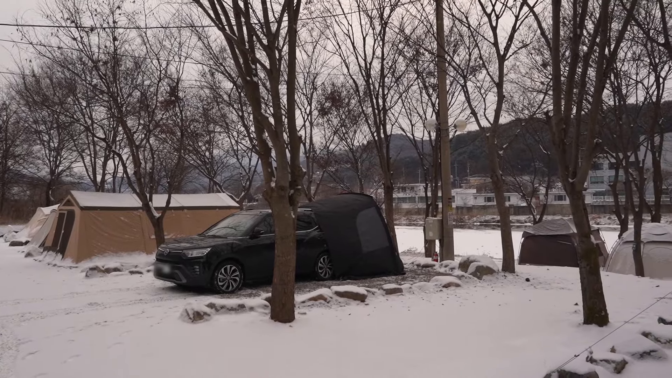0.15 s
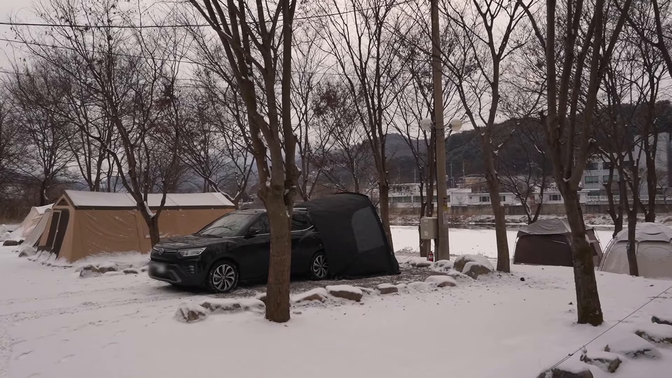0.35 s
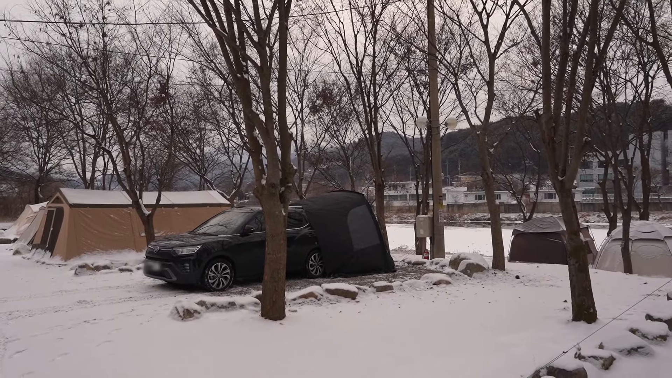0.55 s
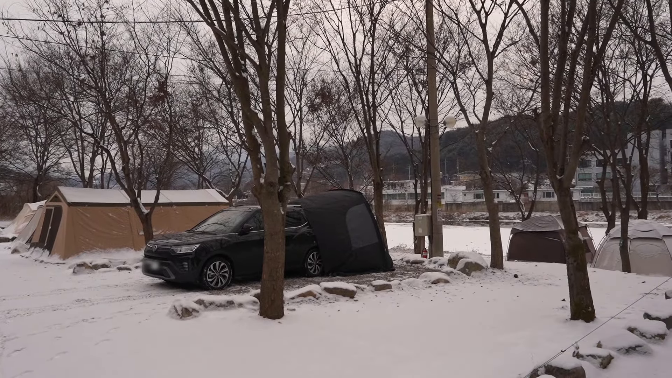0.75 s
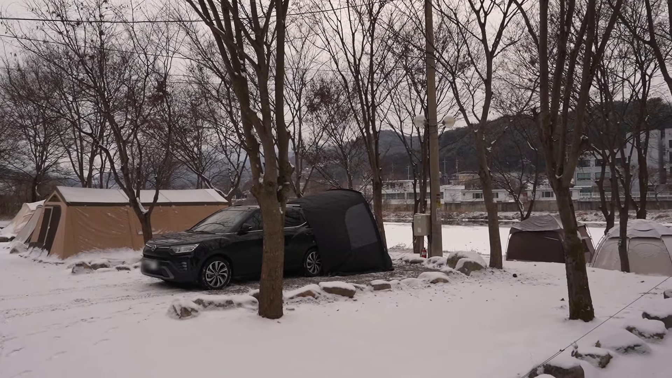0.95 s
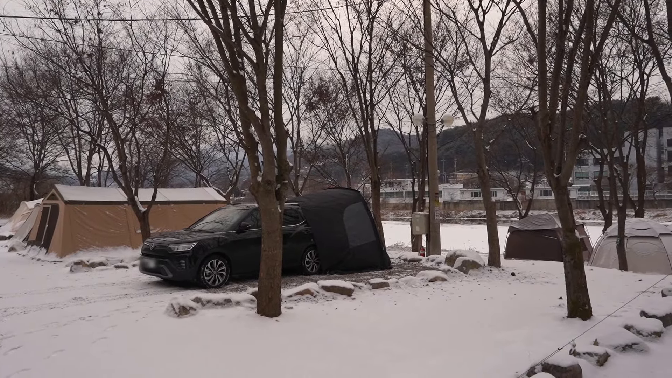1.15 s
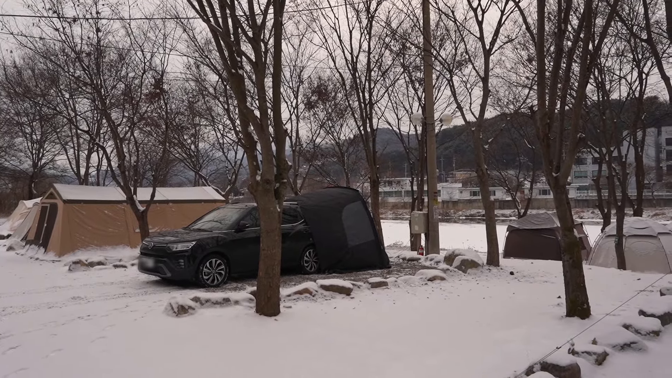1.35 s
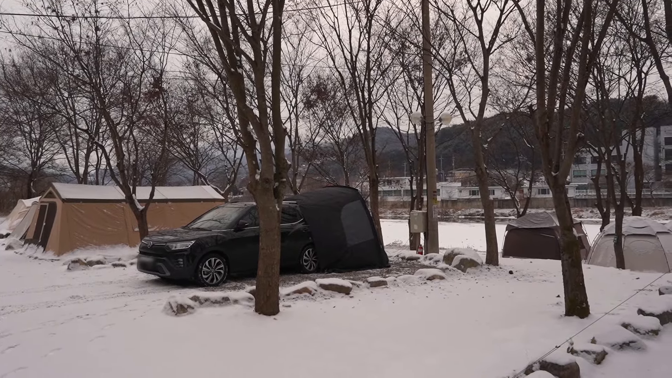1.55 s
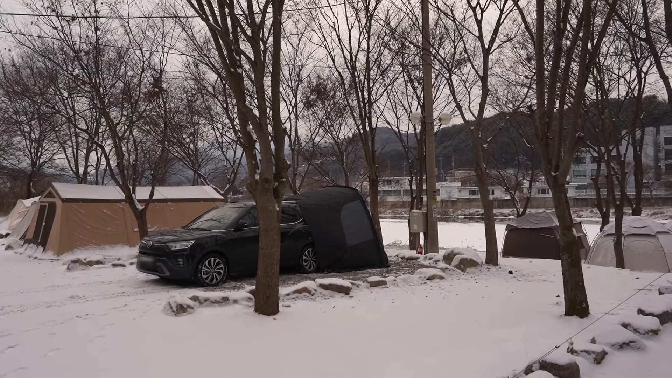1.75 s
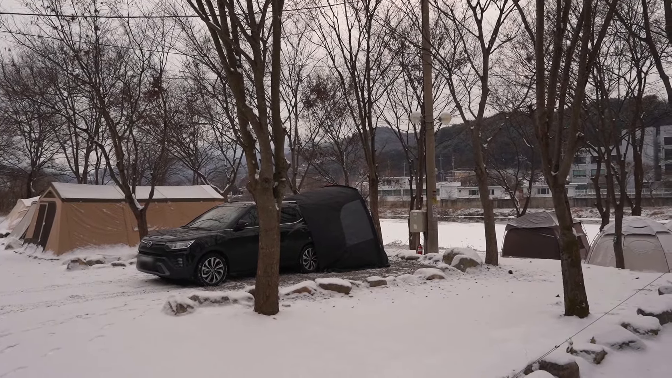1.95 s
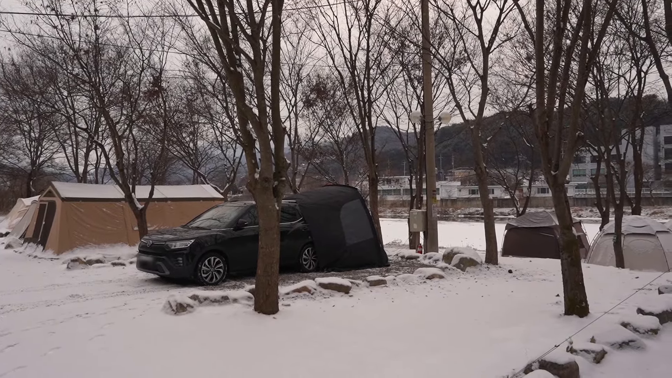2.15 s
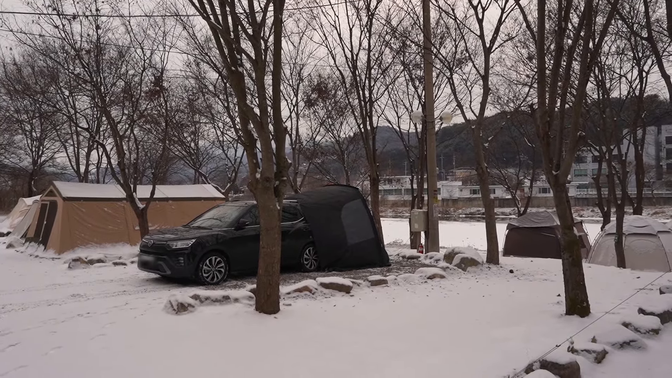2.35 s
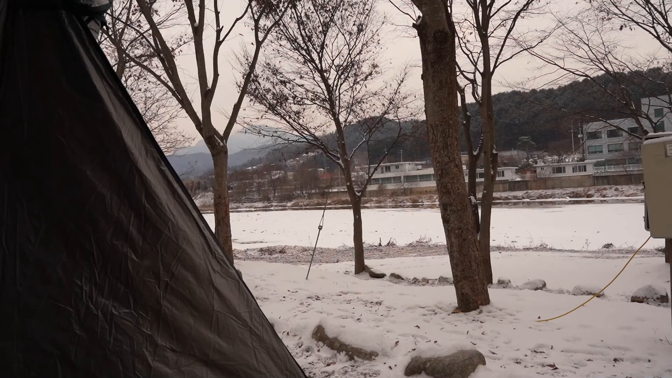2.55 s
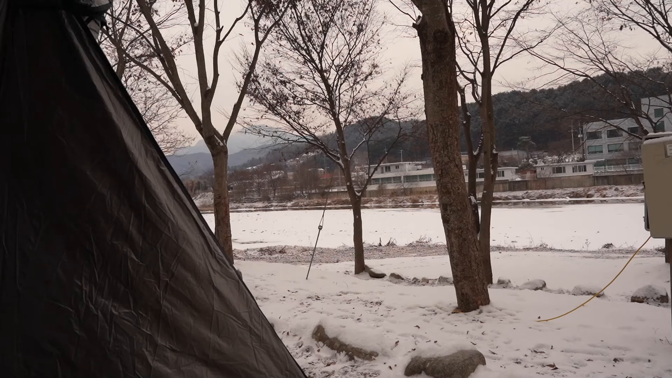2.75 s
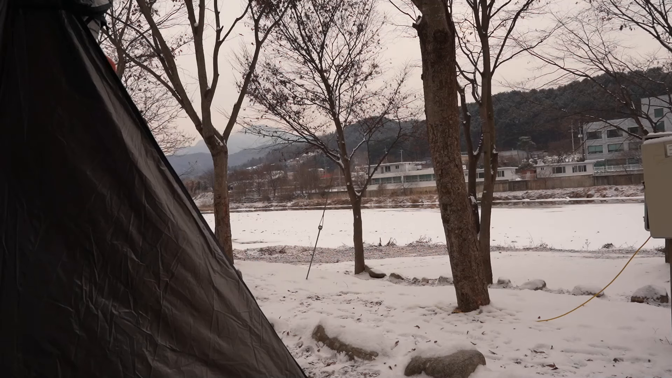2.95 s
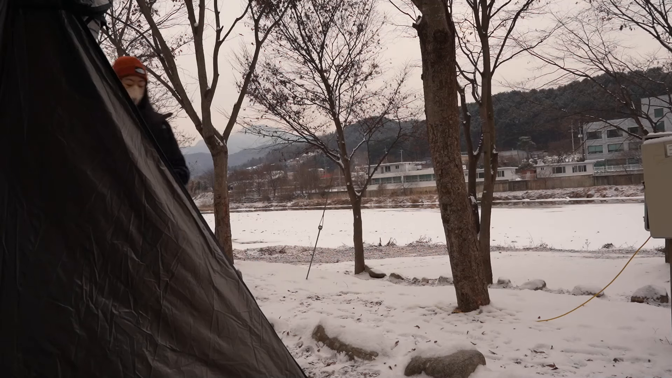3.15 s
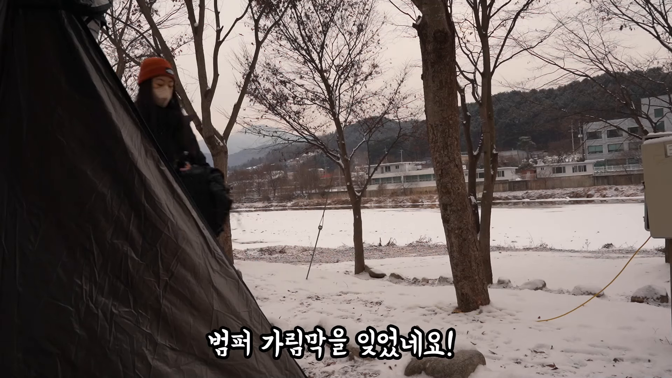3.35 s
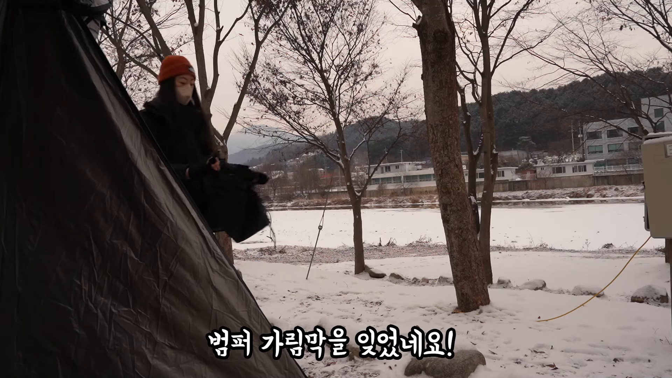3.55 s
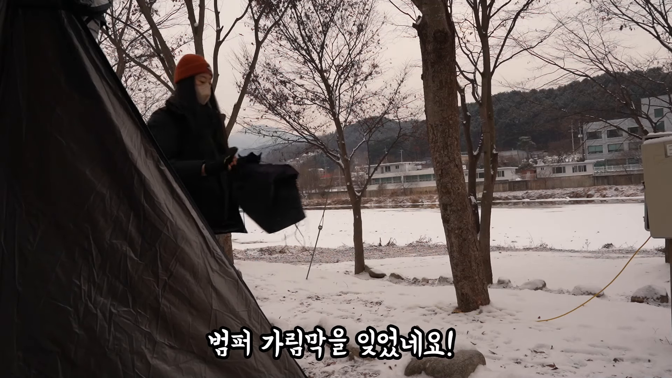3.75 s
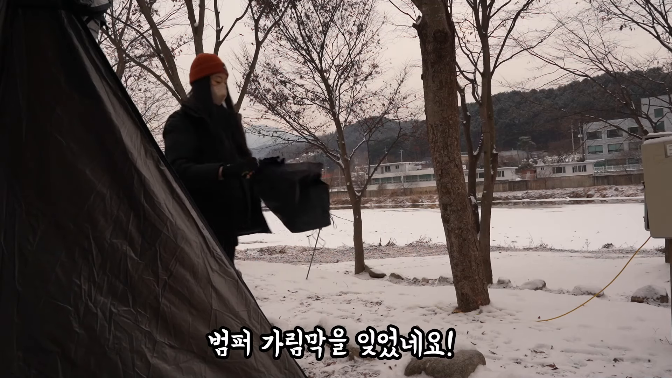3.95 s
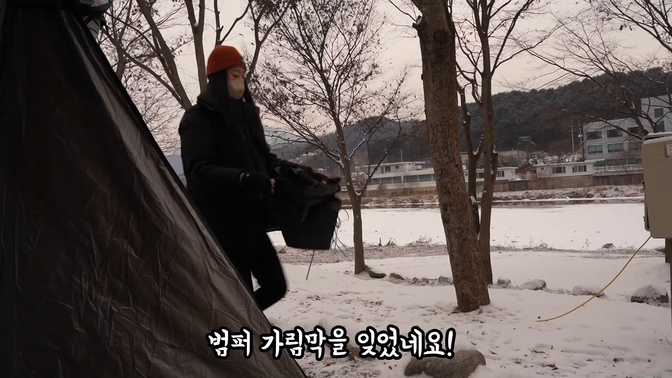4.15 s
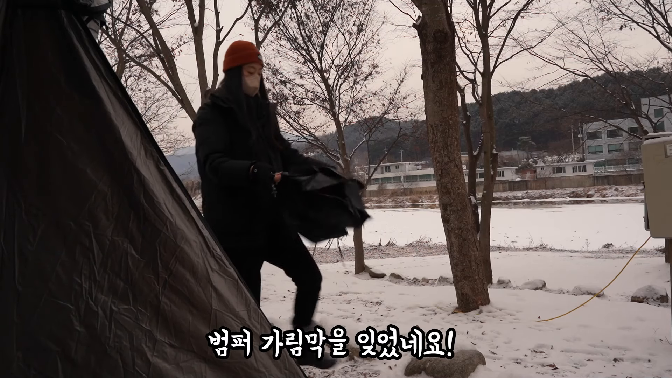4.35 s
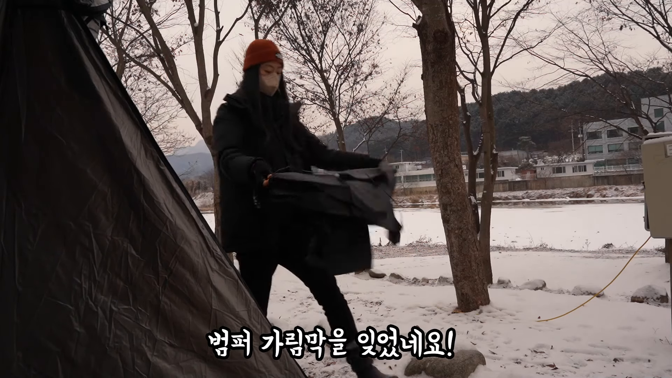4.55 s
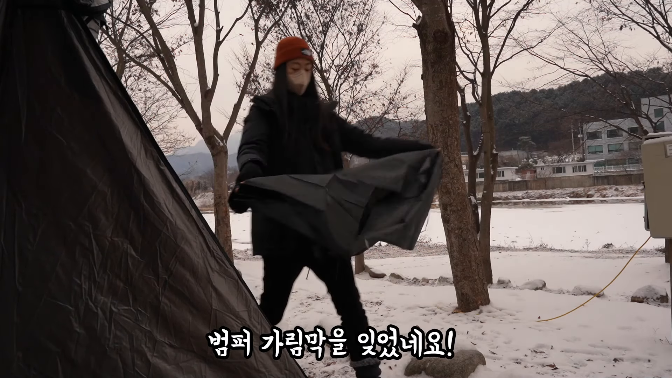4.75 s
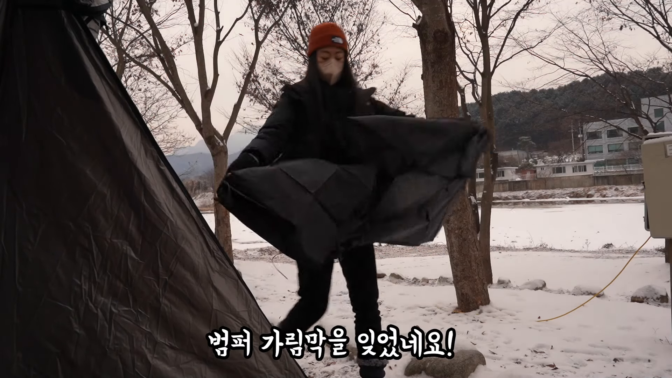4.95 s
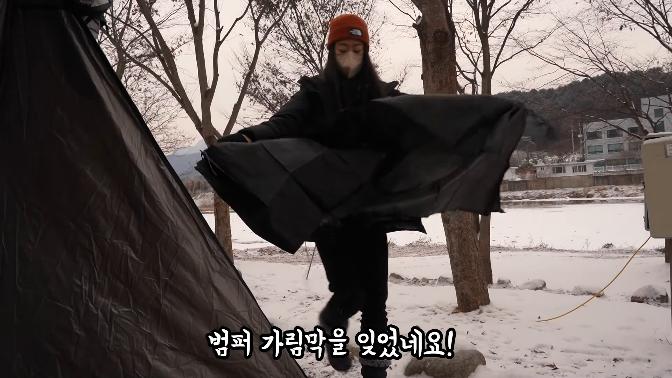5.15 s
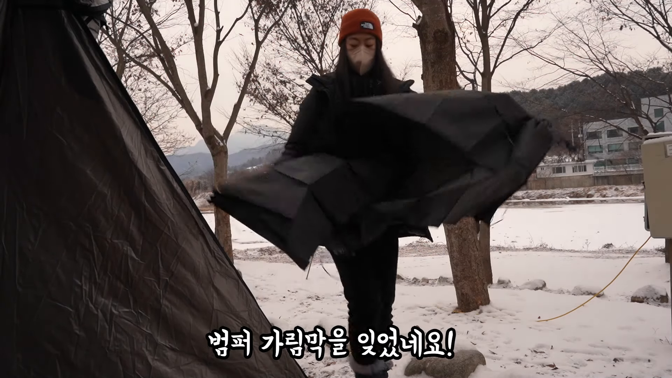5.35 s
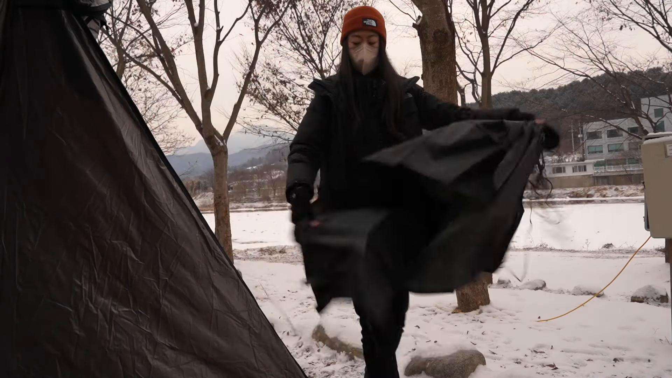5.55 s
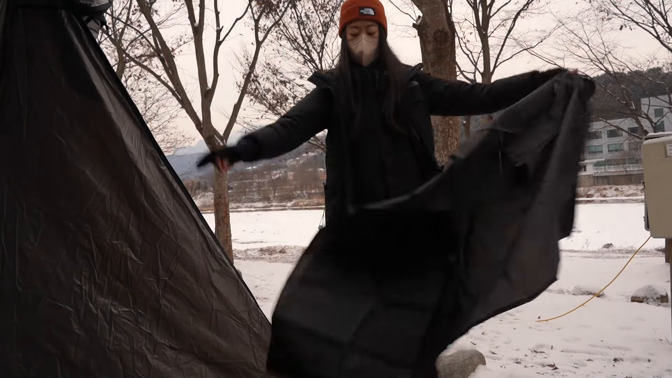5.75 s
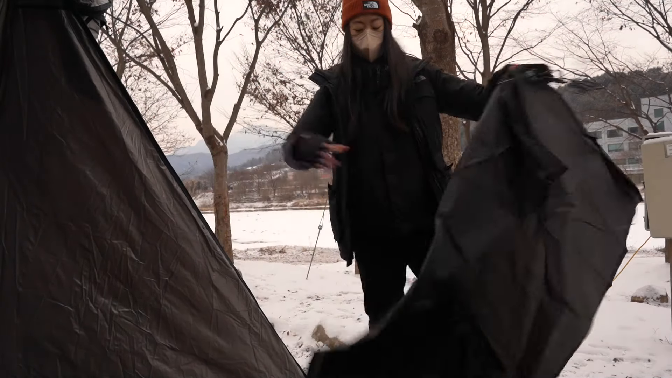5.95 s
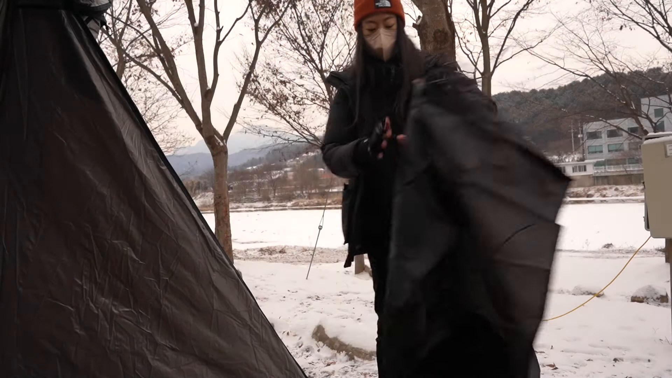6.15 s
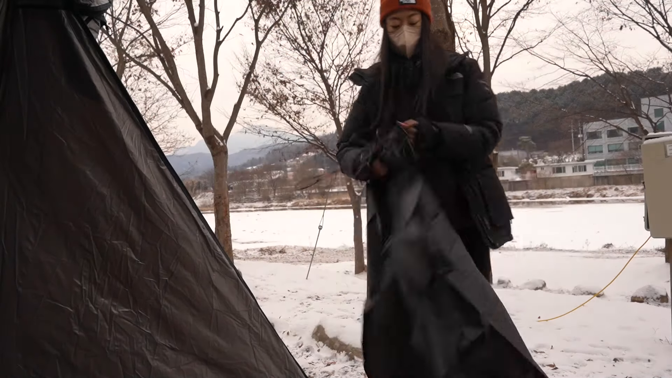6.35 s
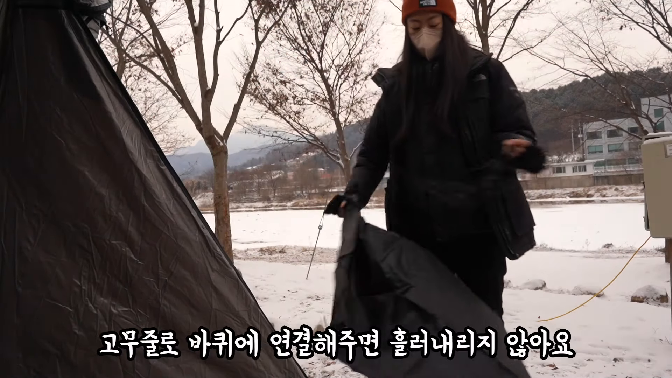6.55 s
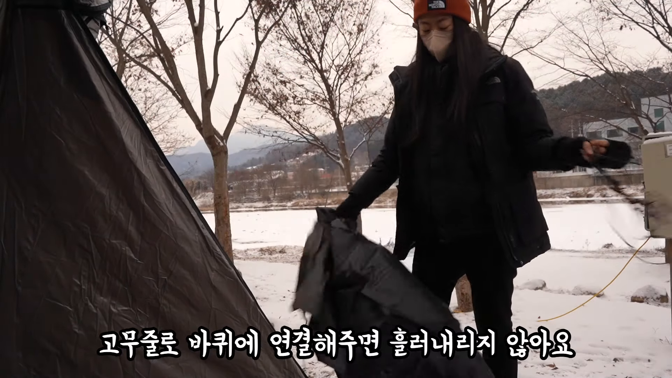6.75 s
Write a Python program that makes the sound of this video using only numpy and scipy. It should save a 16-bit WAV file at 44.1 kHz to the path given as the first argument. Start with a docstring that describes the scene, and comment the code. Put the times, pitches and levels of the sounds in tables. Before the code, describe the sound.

A quiet open-air hum with faint distant barks and bird chirps cuts abruptly to a stiff synthetic sheet rustling, crackling and snapping ever louder up close.

```python
"""A stiff synthetic curtain is carried closer, unfolded and shaken out: bursts of filtered noise and
plucked resonators for its creases, a smooth swish, louder single snaps, a low noise rumble.
Before it, joined by a cut: a quiet snowy camp ground with far traffic hum (banded noise), distant
barks (hoarse partials), a small bird (swept near sines) and a few nearby ticks (noise puffs)."""
import sys
import numpy as np
from scipy import signal
from scipy.io import wavfile
from scipy.ndimage import uniform_filter1d

SR = 44100
rng = np.random.default_rng(int(sys.argv[2]) if len(sys.argv) > 2 else 0)


def persist_wave(psi):
    """Save psi, clipped to +-1, as 16-bit WAV."""
    counts = np.round(np.clip(psi, -1, 1) * 32767).astype(np.int16)
    wavfile.write(sys.argv[1], SR, np.atleast_2d(counts).T)


N = 304290

# Far hum and hiss: spectrum (frequency [Hz], relative density [dB])
AIR_COLOUR = [(24, -65), (40, -39), (199, -23), (363, -20), (422, -12.5), (570, -4), (896, 1), (1120, -3),
              (1210, -8), (1300, -2), (1550, -8), (1900, -8.5), (2700, -19.5), (4800, -26.5), (14800, -29),
              (16000, -27)]
# Left-right correlation of the air (frequency [Hz], likeness [-1 to 1])
AIR_LIKENESS = [(60, 0.78), (130, 1), (290, 0.62), (640, 0.79), (1410, 0.18), (3100, -0.7), (6820, 1),
                (15000, 0.98)]
# Stereo balance of the air (frequency [Hz], left minus right [dB])
AIR_BALANCE = [(60, -4), (130, 2), (290, -3), (640, 1.5), (1410, -1), (3100, -5), (6820, 1.5), (15000, -1)]
# Far barks (time [s], length [s], start pitch [Hz], middle pitch [Hz], end pitch [Hz],
# second partial level [dB], fundamental re second partial [dB], throat re second partial [dB])
BARKS = [(0.052, 0.15, 567, 578, 540, -43.5, -11, -5), (0.309, 0.18, 518, 554, 519, -44.5, -14, -3.5),
         (0.583, 0.1, 516, 544, 530, -47.5, -29, -15), (0.902, 0.18, 577, 599, 612, -42, -16, -11),
         (1.132, 0.093, 559, 589, 590, -47.5, -7, -13), (1.971, 0.2, 462, 537, 452, -53, 13, -12),
         (2.328, 0.17, 630, 610, 597, -44.5, -13, -4.5)]
# Bird whistles (time [s], length [s], start [Hz], middle [Hz], end [Hz], level before flutter [dB])
CHIRPS = [(0.429, 0.11, 2930, 5020, 6200, -54.5), (0.519, 0.068, 3300, 4400, 5500, -60),
          (0.635, 0.069, 2550, 3850, 5270, -60), (1.39, 0.1, 2300, 4750, 6550, -50.5),
          (1.5, .055, 3720, 4580, 5500, -62), (1.67, 0.064, 2820, 4070, 5500, -61),
          (1.865, 0.013, 7600, 6660, 6400, -47), (2.38, .01, 7000, 6700, 6600, -60),
          (2.504, 0.067, 2850, 4070, 5140, -47.5)]
# Nearby ticks (time [s], peak before pan [dB], ring [Hz], left minus right [dB])
TICKS = [(1.756, -37.5, 4770, -4), (1.7964, -45, 6470, 2), (1.8145, -31.5, 1600, -1),
         (1.998, -35.5, 3800, -14), (2.2445, -34, 980, -5), (2.2767, -48, 3560, 22),
         (2.2939, -16.5, 3300, -11.5)]
# Low rumble under the cloth, uneven in level (time [s], level [dB])
RUMBLE_LEVEL = [(2.56, -74), (2.68, -65), (2.85, -57), (2.91, -67), (3.1, -64), (3.13, -59), (3.38, -76),
                (3.43, -67), (3.71, -80), (4.03, -63), (4.08, -93), (4.13, -57), (4.18, -77), (4.23, -58),
                (4.29, -93), (4.44, -67), (4.49, -100), (4.66, -62), (4.9, -85), (4.94, -60), (5.25, -95),
                (5.29, -65), (6.08, -58.5), (6.13, -62), (6.23, -56), (6.27, -71), (6.73, -61.5),
                (6.79, -55), (6.81, -66), (6.9, -60)]
# Spectrum of that rumble (frequency [Hz], relative density [dB])
RUMBLE_COLOUR = [(18, -60), (30, -39), (113, -21), (147, -13.5), (183, -13), (260, -6), (340, -29),
                 (570, -120)]
# Creases that snap, folds that flap open
# (time [s], peak before pan [dB], ring [Hz], left minus right [dB], t60 of a 3 kHz ring [s])
SNAPS = [(2.5611, -33, 864, -1, 0.04), (2.575, -27, 853, 2, 0.036), (2.7017, -27, 1120, 1, 0.044),
         (2.7152, -21, 1210, -4, 0.04), (2.746, -25, 1950, 4, 0.04), (2.7754, -22, 883, -1, 0.04),
         (2.8604, -29, 1260, -1.5, 0.04), (2.863, -21.5, 1620, 8, 0.051), (2.872, -29, 1250, -7, 0.046),
         (2.955, -28, 2590, 22, 0.046), (3.041, -29, 1130, 1, 0.061), (3.073, -20, 2900, -9, 0.04),
         (3.0886, -20, 1440, 1.0, 0.05), (3.1322, -20, 1110, 8, 0.028), (3.1355, -16, 2240, -11, 0.03),
         (3.2859, -20, 1290, -7, 0.05), (3.2948, -18, 3060, -2, 0.046), (3.3189, -16, 1250, 5, 0.048),
         (3.3328, -15.5, 2720, -5, 0.087), (3.4797, -19, 1280, 3, 0.04), (3.5065, -22, 1220, -4, 0.025),
         (3.5363, -12.5, 9800, 3, 0.036), (3.5454, -14, 1600, -2, 0.037), (3.5553, -13.5, 3770, -1, 0.04),
         (3.5614, -13, 3270, -11, 0.035), (3.6883, -14, 3290, -9, 0.033), (3.7295, -19, 3500, -16, 0.04),
         (3.8023, -13, 3280, -2, 0.037), (3.8275, -9, 8100, -1, 0.044), (3.86, -14, 2990, 0.5, 0.036),
         (3.878, -15, 3880, 1.0, 0.04), (3.892, -21, 3600, -1, 0.04), (3.925, -13.5, 3480, -4, 0.047),
         (4.008, -25, 3130, -8, 0.04), (4.0493, -19.5, 930, 0.5, 0.066), (4.1024, -31, 2990, 1, 0.044),
         (4.154, -21, 1010, 5, 0.045), (4.183, -14.5, 930, -4, 0.046), (4.218, -24, 4510, -7, 0.04),
         (4.2374, -26, 840, 5, 0.058), (4.2986, -17, 3420, 4, 0.04), (4.4097, -16, 8320, -2, 0.043),
         (4.5946, -8, 1530, 1, 0.049), (4.6714, -20, 3700, -2, 0.035), (4.8252, -7, 910, 2, 0.094),
         (4.8886, -7.5, 3600, 0.0, 0.04), (4.9545, -14, 10000, -3, 0.015), (5.0204, -19, 961, 0, 0.04),
         (5.06, -17, 9000, -2, 0.012), (5.094, -10.5, 2100, -10, 0.04), (5.11, -19, 1580, 2, 0.04),
         (5.1595, -11, 1250, 1, 0.032), (5.2026, -12, 5040, -3, 0.032), (5.2207, -22, 1580, -0.5, 0.049),
         (5.2575, -13, 9000, -1.5, 0.01), (5.31, -19, 1320, -7, 0.047), (5.3775, -7, 7100, -1.0, 0.01),
         (5.4963, -10, 9400, 6, 0.006), (5.5456, -6, 3640, -3, 0.03), (5.724, -10.5, 1840, -9, 0.1),
         (5.9728, -17, 1160, -12, 0.055), (5.9834, -14, 1260, -7, 0.064), (6.2233, -26, 1250, 3, 0.04),
         (6.2344, -8.5, 1870, -8, 0.069), (6.27, -12, 7000, 3, 0.04), (6.3485, -10.5, 1580, -6, 0.053),
         (6.379, -12, 1500, -9, 0.034), (6.4313, -5, 7600, -1, 0.064), (6.4452, -8, 3800, -3, 0.069),
         (6.4895, -8.5, 4540, -2, 0.03), (6.5212, -7.5, 9500, -1, 0.087), (6.564, -9, 9450, 2, 0.044),
         (6.6888, -10.5, 3660, 0, 0.04), (6.7398, -10, 1600, -3, 0.056), (6.795, -21, 4600, -9, 0.04),
         (6.8377, -13, 1290, -1, 0.04)]
# Handling of the cloth
# (time [s], crackle level [dB], low folds re crackle [dB], sheen re crackle [dB])
CLOTH_HANDLING = [(2.56, -43, 6, -5), (2.58, -36.5, -2.5, -12), (2.6, -42.5, 6.5, -2), (2.69, -43, 8.5, -2),
                  (2.72, -35, -1, -7), (2.79, -35.5, 2.5, -2.5), (2.85, -44.5, 8, 2),
                  (2.86, -31, -0.5, -16), (2.92, -40.5, 7.5, -5), (2.96, -33.5, 1.5, -13),
                  (3.01, -42.5, 9, 1), (3.04, -34.5, 3.5, -7), (3.08, -33, 1.5, -2),
                  (3.19, -40.5, 9.5, -1.5), (3.27, -36.5, 4.5, 0.5), (3.3, -34.5, 3, -4),
                  (3.42, -38.5, 4.5, 0), (3.53, -34.5, -1, 2.5), (3.56, -25, -7.5, -3), (3.59, -35.5, 0, 4),
                  (3.61, -31, 0, 1.5), (3.77, -30.5, -4.5, -1), (3.86, -25, -5.5, 0.5), (3.94, -27, -1, -1),
                  (4.0, -38, 2.5, 2), (4.01, -29, -7, -9), (4.02, -36, 2.5, -6), (4.25, -30.5, -3, -0.5),
                  (4.31, -20.5, -3.5, 0), (4.32, -28.5, -1.5, 1), (4.4, -23, -8, 3.5), (4.44, -25, -9, 2),
                  (4.72, -21, -8, -3), (4.99, -30, -7, -1), (5.05, -28.5, -4.5, 0.5), (5.1, -24, -9, -5),
                  (5.18, -28.5, -6.5, -1), (5.21, -22.5, -10.5, -2.5), (5.24, -29, -8, 0.5),
                  (5.3, -26.5, -4.5, 0), (5.48, -21, -6.5, -2), (5.51, -29, -7.5, 3), (5.55, -22, -7, 0),
                  (5.81, -26.5, -3.5, -2.5), (5.85, -21, -7.5, -3), (5.96, -30, -2.5, -4),
                  (6.02, -21.5, -6, -1), (6.04, -26, -7.5, -3.5), (6.16, -32.5, -4, 0.5),
                  (6.27, -24.5, -9, -4), (6.32, -29.5, -10.5, 1), (6.37, -24.5, -5, -1),
                  (6.54, -28, -11.5, 0.5), (6.62, -31.5, -3.5, 0), (6.75, -25, -8.5, -5.5),
                  (6.77, -31, -3.5, 5), (6.8, -23, -5, -1), (6.84, -21, -5.5, -2), (6.86, -26.5, -12, -2),
                  (6.9, -23.5, -4, -3)]
# Cloth spectrum (frequency [Hz], relative density [dB])
CLOTH_COLOUR = [(120, -48), (200, -12), (236, -15), (456, -10.5), (916, -2.5), (1040, -9), (1180, 0.5),
                (2380, -4.5), (3560, -3.5), (4900, -5), (6520, -8), (11100, -9.5), (15100, -13),
                (16000, -13)]
# Left-right correlation of the cloth (frequency [Hz], likeness [0 to 1])
CLOTH_LIKENESS = [(60, 0.56), (130, 0.69), (290, 1), (640, .9), (1410, 0.61), (3100, 0.21), (4700, 0.039),
                  (6820, 0.33), (15000, 0.61)]
# Stereo balance of the cloth (frequency [Hz], left minus right [dB])
CLOTH_BALANCE = [(60, 0), (130, -2), (290, 0.1), (640, 1.5), (1410, -2.5), (3100, 2), (6820, -1.5),
                 (15000, 1.8)]
# Cloth comes nearer and is spread open (time [s], left minus right [dB], bundle hump [0 to 1])
CLOTH_SPREAD = [(2.56, 1, 0.34), (3.2, 0.5, 0.5), (3.55, 0.5, 0.75), (3.9, 0, 0.9), (4.15, -0.3, 0.35),
                (4.45, -0.3, 0.47), (5.1, -0.5, 0.1), (5.6, -1, 0.51), (6.2, -0.8, 0), (6.9, 0.1, 0.24)]
# Cloth starts off left, heard there first (time [s], lead of the left microphone [ms])
LEFT_LEAD = [(2.56, 0.14), (3.1, 0.26), (4.3, 0.22), (4.5, 0.058), (6.9, 0.0)]
# Level across the cut: camp ground, then cloth (time [s], gain)
QUIET_GAIN = [(0, 1), (2.535, 1), (2.558, .25), (2.56, 0)]
NEAR_GAIN = [(2.559, 0), (2.561, 1), (6.9, 1)]

AIR_DB = -44.5
BARK_UPPER_DB = (-13, -15, -21)   # third to fifth partial re second
BARK_ROUGH_HZ, THROAT_HZ = 30, 744   # hoarseness corner of partial 1; fixed throat resonance
BARK_ECHO_S, BARK_ECHO_DB = .03, -7
BIRD_FLUTTER_DB, BIRD_WOBBLE_RAD, BIRD_OCTAVE_DB, BIRD_PAN_DB = 3, .85, -22, -4
BIRD_ECHO_DB, BIRD_ECHO_T60_S = -5, .15   # scatter off trunks and tents
TICK_T60_S, TICK_WIDTH_RATIO, SNAP_WIDTH_RATIO = .009, 1.4, 1.24   # t60 at 3 kHz; hump edges re ring
LOW_RINGS_LONGER = .067   # click decay time goes with (3 kHz / ring) to this power
CRACK_T60_S, CRACK_DB = .012, 2   # sharp opening of a click, re its puff
CREASES_PER_S, HANDLING_REF_DB, DENSER = 900, -32.5, .82   # rate before clumping at reference handling
CREASE_SPREAD_DB, GRAIN_S = 3.0, .005   # uneven crease sizes; decay constant of one burst
SWISH = 2.4   # sliding of the fabric at reference handling, crackle grains have rms 1
RING_CYCLES, RING_DB = 32, -6   # cycles to -60 dB; taut facets re noise part
PRICKS_PER_S, PRICK_DB, PRICK_T60_S = 160, 5, .004   # rate at reference handling and above
WAVER_DB, WAVER_HZ = .9, 28   # random wavering of the cloth level: spread, drift corner
BUNDLE_HZ, LEAD_BAND_HZ = (2740, 3630), (1300, 5000)   # bundled cloth's hump; band of the left lead
ROUND_OFF, CUTOFF_HZ = .8, 16150   # peak ceiling; top of the spectrum
OPPOSITE = np.array([[1], [-1]])


def from_db(db):
    """Decibels to gain."""
    return 10 ** (np.asarray(db) / 20)


def rms_one(x):
    """Scale to unit rms."""
    return x / np.sqrt(np.mean(x ** 2) + 1e-20)


def in_time(rows):
    """Columns of a time curve, one value per sample."""
    s, *columns = np.transpose(rows)
    return [np.interp(np.arange(N) / SR, s, c) for c in columns]


def at_hz(points, hz):
    """Read a spectrum on a log-frequency axis."""
    point_hz, value = np.array(points).T
    return np.interp(np.log(hz), np.log(point_hz), value)


def pan(left_minus_right_db):
    """Left and right gains."""
    return from_db(np.array([left_minus_right_db / 2, -left_minus_right_db / 2]))


def band_pass(order, edges_hz):
    """Butterworth band-pass sections."""
    return signal.butter(order, edges_hz, "band", fs=SR, output="sos")


def high_pass(x, hz):
    """Steep low cut."""
    return signal.sosfilt(signal.butter(6, hz, "high", fs=SR, output="sos"), x)


def drift(corner_hz):
    """Unit-spread random drift: two-pole filtered noise, computed every 40 samples."""
    r = np.exp(-80 * np.pi * corner_hz / SR)
    noise = rng.standard_normal(N // 40 + 2002)
    slow = signal.lfilter([1], [1, -2 * r, r * r], noise)[2000:]   # settled part
    return np.interp(np.arange(N) / 40, np.arange(len(slow)), rms_one(slow))


def bands(excite, colour, likeness, balance, gain_db, which=range(18)):
    """Half-octave stereo noise; excite() shapes a band before its filter, gain_db(hz) after."""
    out, edges_hz = 0, 35 * 2 ** (np.arange(19) / 2)
    white = rng.standard_normal((2, 2, N))   # neighbouring bands get unrelated noise
    for k in which:
        low_hz, high_hz = edges_hz[k:k + 2]
        mid, side = signal.sosfilt(band_pass(2, [low_hz, high_hz]), excite() * white[k % 2])
        hz = np.sqrt(low_hz * high_hz)
        alike = np.clip(at_hz(likeness, hz), -.98, .98)
        pair = np.sqrt(1 + alike) * mid + np.sqrt(1 - alike) * side * OPPOSITE
        gain = from_db(at_hz(colour, hz) + gain_db(hz))
        out = out + gain * pan(at_hz(balance, hz))[:, None] * pair
    return out


def glide(length_s, start_hz, middle_hz, end_hz):
    """Phase of a tone on a parabola through three pitches, and its progress 0-1."""
    u = np.linspace(0, 1, int(length_s * SR))
    hz = np.polyval(np.polyfit([0, .5, 1], [start_hz, middle_hz, end_hz], 2), u)
    return 2 * np.pi * np.cumsum(hz) / SR, u


def add(out, s, sound):
    """Mix a short sound in at time s."""
    i = round(s * SR)
    out[:, i:i + sound.shape[1]] += sound[:, :N - i]


def air():
    """Far hum and hiss: steady noise wavering band by band."""
    sound = bands(lambda: 1, AIR_COLOUR, AIR_LIKENESS, AIR_BALANCE, lambda hz: drift(16.0))
    return from_db(AIR_DB) * rms_one(sound)


def dogs(clear=.9):
    """Far barks: gliding partials and a fixed throat tone, blurred by random drift, plus one echo."""
    out = np.zeros((2, N))
    widths_hz = BARK_ROUGH_HZ * np.arange(1, 6) ** 1.5   # higher partials are blurred more
    common, apart = [[drift(hz) + 1j * drift(hz) for hz in widths_hz] for part in range(2)]
    for s, length_s, start_hz, middle_hz, end_hz, level_db, first_db, throat_db in BARKS:
        phase, u = glide(length_s, start_hz, middle_hz, end_hz)
        now = slice(round(s * SR), round(s * SR) + len(u))
        for k, db in enumerate((first_db, 0, *BARK_UPPER_DB)):
            hoarse = clear + .87 * common[k][now] + .092 * apart[k][now] * OPPOSITE
            partial = np.real(hoarse * np.exp(1j * (k + 1) * phase))
            add(out, s, from_db(level_db + db) * np.sin(np.pi * u ** .62) * partial)
        throat = (clear + .69 * apart[0][now]) * np.exp(2j * np.pi * THROAT_HZ * length_s * u)
        envelope = np.sin(np.pi * u ** .5)
        add(out, s, from_db(level_db + throat_db) * envelope * np.real([throat, throat]))
    lag = round(BARK_ECHO_S * SR)
    out[:, lag:] += from_db(BARK_ECHO_DB) * out[::-1, :-lag]   # sides swapped
    return out


def bird():
    """Swept near sines, shaky in phase and strength, smeared by a decaying noise echo."""
    out = np.zeros((2, N))
    shake = from_db(BIRD_FLUTTER_DB * drift(63)) * np.exp(1j * BIRD_WOBBLE_RAD * drift(170))
    for s, length_s, start_hz, middle_hz, end_hz, level_db in CHIRPS:
        phase, u = glide(length_s, start_hz, middle_hz, end_hz)
        shaky = shake[round(s * SR):][:len(u)]
        tone = np.real(shaky * (np.exp(1j * phase) + from_db(BIRD_OCTAVE_DB) * np.exp(2j * phase)))
        envelope = np.sin(np.pi * u ** .7) ** .9
        add(out, s, from_db(level_db) * pan(BIRD_PAN_DB)[:, None] * tone * envelope)
    decay = from_db(-60 * np.arange(4000) / SR / BIRD_ECHO_T60_S)
    scatter = rng.standard_normal((2, 4000)) * decay
    scatter = scatter / np.sqrt(np.sum(scatter ** 2, axis=1, keepdims=True))
    return out + from_db(BIRD_ECHO_DB) * signal.oaconvolve(out, scatter, axes=1)[:, :N]


def clicks(table, width_ratio, bright_db):
    """Ticks or snaps: a sharp edge and a dying noise puff, broad with a hump at the ring pitch."""
    out, t = np.zeros((2, N)), np.arange(4000) / SR
    noise = rng.standard_normal((len(table), 2, len(t)))
    for (s, peak_db, hz, pan_db, t60_s), (mid, side) in zip(table, noise):
        pair = np.append(2.5, mid[1:]) + .5 * side * OPPOSITE   # microphones differ a little
        puff = pair * from_db(-60 * t / t60_s * (hz / 3000) ** LOW_RINGS_LONGER)
        puff = puff + pair * from_db(CRACK_DB - 60 * t / CRACK_T60_S)
        hump_edges_hz = [hz / width_ratio, min(hz * width_ratio, 16000)]
        hump = signal.sosfilt(band_pass(2, hump_edges_hz), puff)
        broad = signal.sosfilt(band_pass(2, [550, 12000]), puff)
        sound = hump / np.abs(hump).max() + from_db(bright_db) * broad / np.abs(broad).max()
        add(out, s, from_db(peak_db) * pan(pan_db)[:, None] * sound / np.abs(sound).max())
    return out


def rumble():
    """Low rumble: lumpy low noise."""
    sound = bands(lambda: 1, RUMBLE_COLOUR, CLOTH_LIKENESS, [(1, 0)],
                  lambda hz: 6.0 * drift(7.4), which=range(6))
    return from_db(in_time(RUMBLE_LEVEL)[0]) * rms_one(sound)


def delay_right(x, lead_ms):
    """Arrival lag of an off-centre source: the right channel's middle band is read late."""
    band = signal.sosfiltfilt(band_pass(3, LEAD_BAND_HZ), x[1])
    late = np.interp(np.arange(N) - lead_ms * SR / 1000, np.arange(N), band)
    return np.array([x[0], x[1] - band + late])


def facets(sizes, tilt_db):
    """Each crease plucks one taut facet: a decaying resonator, from low folds to fine wrinkles."""
    pitches_hz, out = np.geomspace(450, 14000, num=36), 0
    dealt, pan_db = rng.integers(len(pitches_hz), size=N), 3 * rng.standard_normal(N)
    plucks = sizes * pan(pan_db) * rng.choice([-1, 1], N)
    apart = (1 - at_hz(CLOTH_LIKENESS, pitches_hz[dealt])) / 2   # share in opposite polarity
    plucks[1] *= np.where(rng.random(N) < apart, -1, 1)
    for k, hz in enumerate(pitches_hz):
        r, w = from_db(-60 * hz / RING_CYCLES / SR), 2 * np.pi * hz / SR
        gain = from_db(at_hz(CLOTH_COLOUR, hz) + tilt_db(hz)) * np.sqrt(hz)
        ring = signal.lfilter([np.sin(w) * np.sqrt(1 - r)], [1, -2 * r * np.cos(w), r * r],
                              plucks * (dealt == k) + 1e-18)
        out = out + gain * ring
    return rms_one(out)


def pricks(busy):
    """The stiffest creases flip at once: lone, very short, bright noise ticks."""
    born = rng.random(N) < PRICKS_PER_S * busy / SR
    uneven_db = CREASE_SPREAD_DB * (np.minimum(rng.exponential(1, N), 2) - 1)
    sizes = born * np.sqrt(busy) * from_db(PRICK_DB + uneven_db)
    panned = sizes * pan(4 * rng.standard_normal(N))
    shape = signal.lfilter([1], [1, -from_db(-60 / PRICK_T60_S / SR)], panned)
    mid, side = rng.standard_normal((2, N))
    return signal.sosfilt(band_pass(1, [1500, 14000]), shape * (mid + .5 * side * OPPOSITE))


def cloth():
    """Buckling creases: short bursts in clumps, over the smooth swish of sliding fabric."""
    crackle_db, body_db, sheen_db = in_time(CLOTH_HANDLING)
    pan_db, bundled = in_time(CLOTH_SPREAD)
    # harder handling buckles more creases a second, which blend
    busy = from_db(DENSER * (crackle_db - HANDLING_REF_DB))
    born = rng.random(N) < CREASES_PER_S * busy * from_db(2.0 * drift(18)) / SR
    uneven_db = CREASE_SPREAD_DB * np.minimum(rng.exponential(1, N), 3.0)
    sizes = born * from_db(uneven_db) / np.sqrt(busy)
    grains = rms_one(signal.lfilter([1], [1, -np.exp(-1 / (GRAIN_S * SR))], sizes))
    swish = SWISH * np.sqrt(busy) ** .45

    def excite():
        """Some creases sound in every band, others (time-shifted) in one: each has its own colour."""
        return swish + grains + .96 * np.roll(grains, rng.integers(N))

    def tilt_db(hz, usual_body_db=-4.5, usual_sheen_db=-2.0):
        """Large folds stir the low bands, fine rubbing the high ones."""
        body = np.interp(np.log(hz), np.log([1400, 2600]), [1, 0])
        sheen = np.interp(np.log(hz), np.log([5500, 9000]), [0, 1])
        folds_db = body * (body_db - usual_body_db)
        rubbing_db = sheen * (sheen_db - usual_sheen_db)
        return folds_db + rubbing_db + drift(9.2)

    sound = rms_one(bands(excite, CLOTH_COLOUR, CLOTH_LIKENESS, CLOTH_BALANCE, tilt_db,
                          which=range(5, 18)))
    sound = sound + from_db(RING_DB) * facets(sizes * np.sqrt(np.minimum(busy, 1)), tilt_db)
    sound = sound + bundled * signal.sosfiltfilt(band_pass(2, BUNDLE_HZ), sound)
    # level out by the 2-6 kHz power, so that the handling sets the level
    crackle = signal.sosfilt(band_pass(2, [2000, 6000]), sound)
    sound = sound / np.sqrt(uniform_filter1d(np.mean(crackle ** 2, axis=0), size=6000))
    level = from_db(crackle_db + WAVER_DB * drift(WAVER_HZ))
    return level * pan(pan_db) * (sound + pricks(np.minimum(busy, 1)))


def scene():
    """Camp ground, then cloth, joined by a quick fade."""
    ticks = clicks([(*tick, TICK_T60_S) for tick in TICKS], TICK_WIDTH_RATIO, bright_db=-10.0)
    quiet = air() + bird() + high_pass(dogs(), 320) + ticks
    near = high_pass(cloth() + clicks(SNAPS, SNAP_WIDTH_RATIO, bright_db=6.0), 297)
    near = delay_right(near, in_time(LEFT_LEAD)[0]) + rumble()
    return quiet * in_time(QUIET_GAIN)[0] + near * in_time(NEAR_GAIN)[0]


def record(dry):
    """Peaks are rounded, the top is cut steeply."""
    rounded = ROUND_OFF * np.tanh(dry / ROUND_OFF)
    return signal.sosfilt(signal.ellip(12, .3, 75, CUTOFF_HZ, fs=SR, output="sos"), rounded)


dry = scene()
out = record(dry)
persist_wave(out)
```